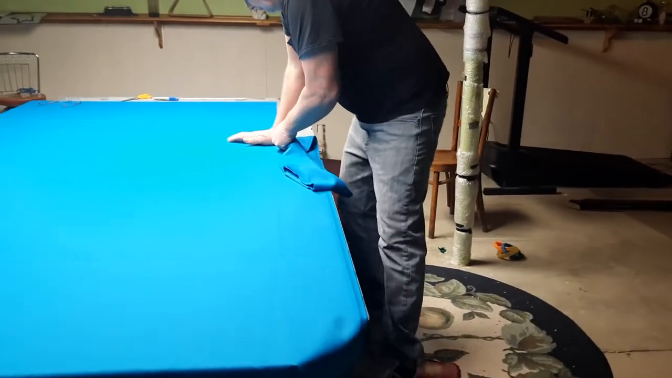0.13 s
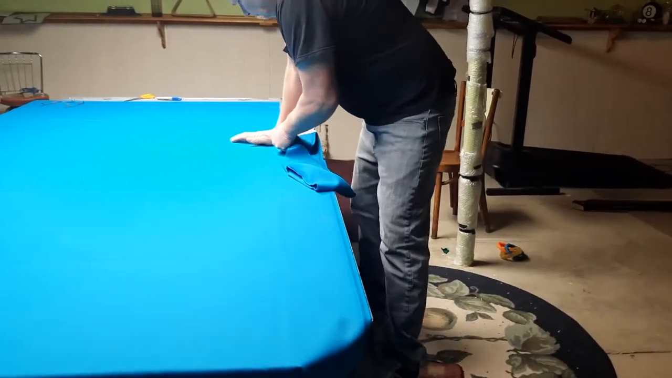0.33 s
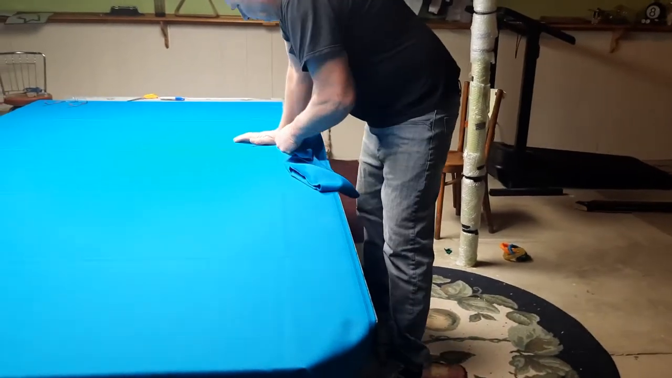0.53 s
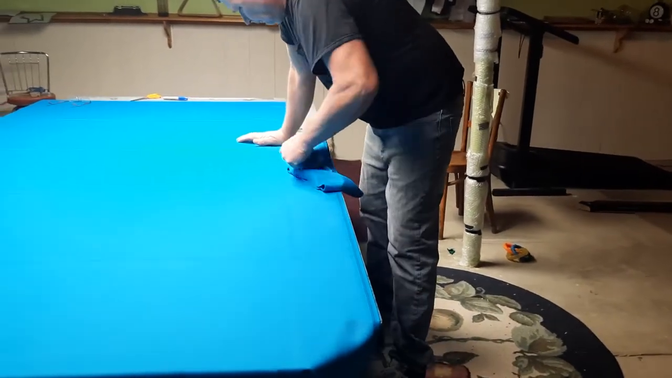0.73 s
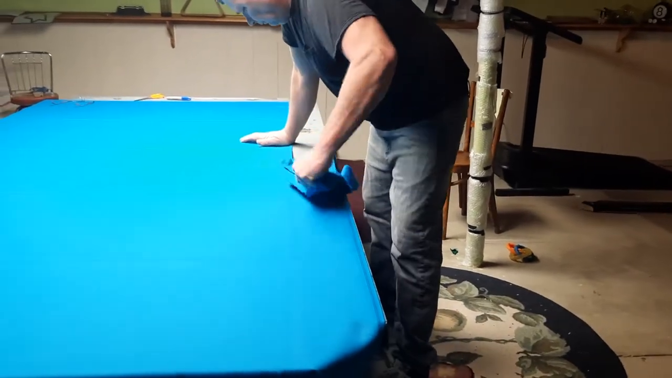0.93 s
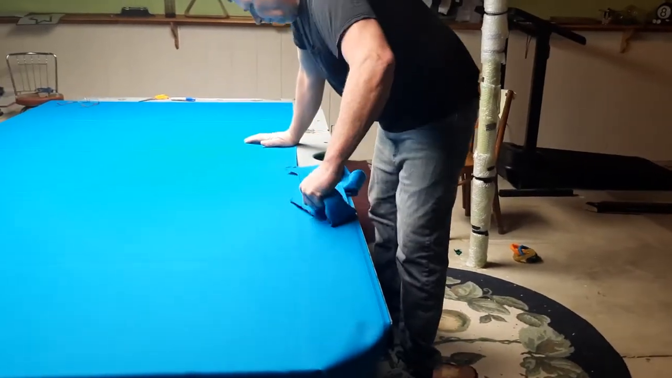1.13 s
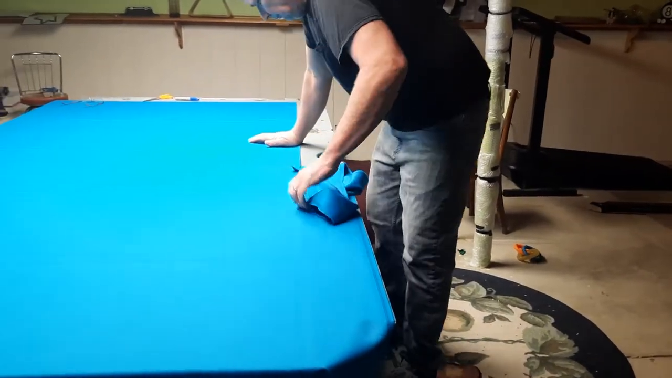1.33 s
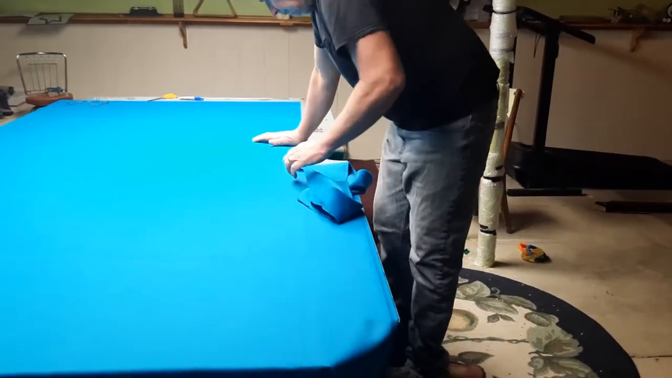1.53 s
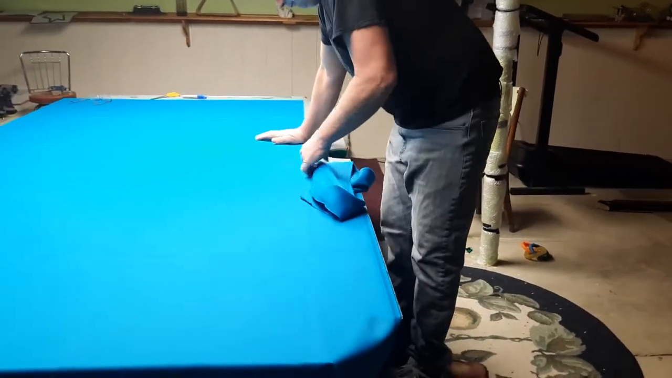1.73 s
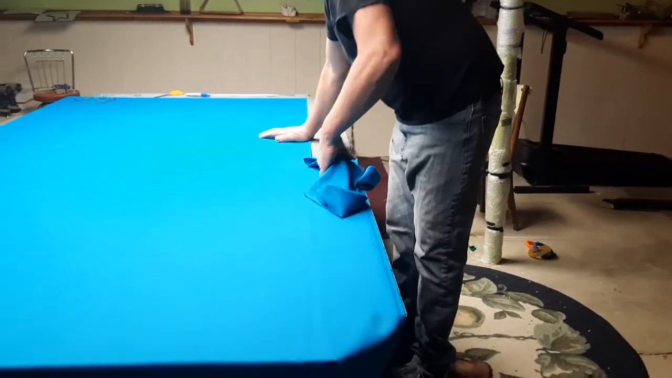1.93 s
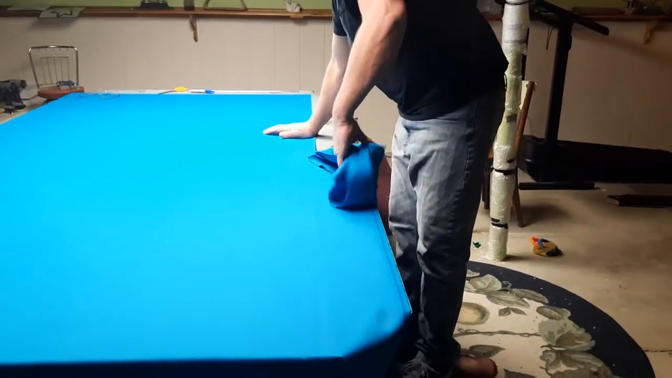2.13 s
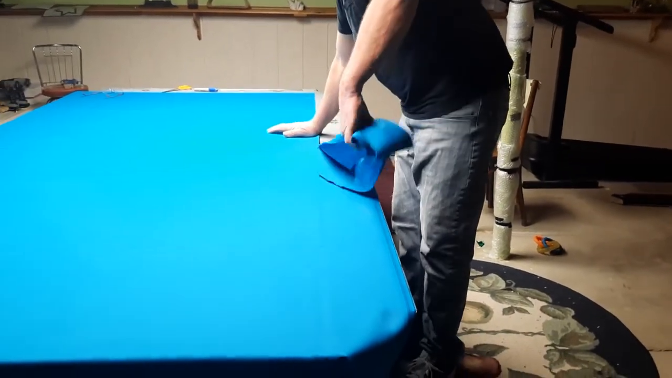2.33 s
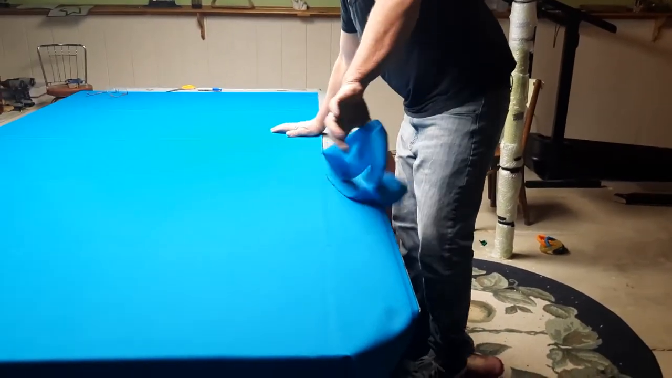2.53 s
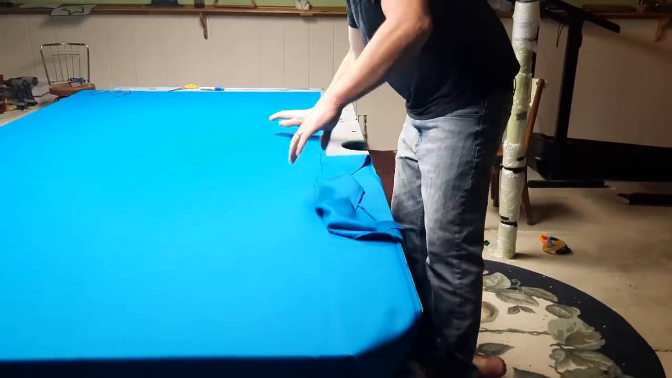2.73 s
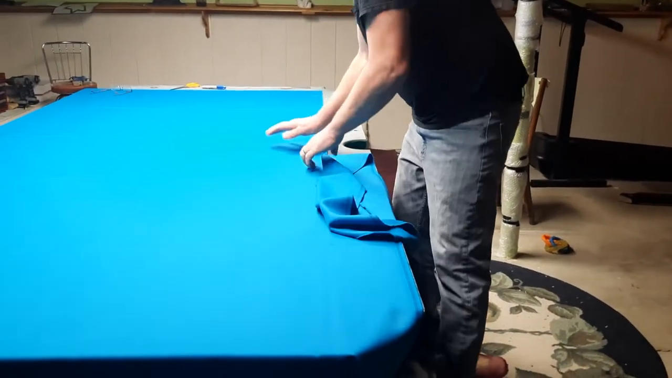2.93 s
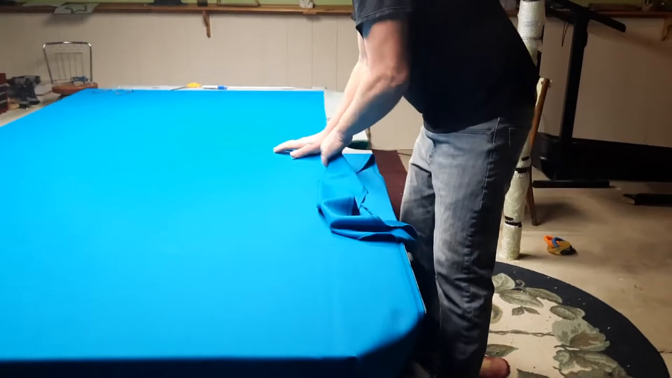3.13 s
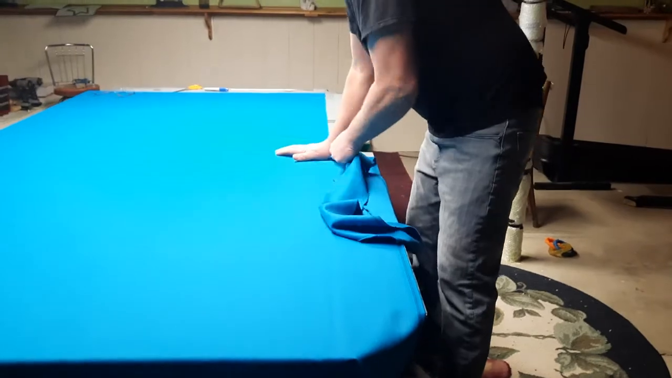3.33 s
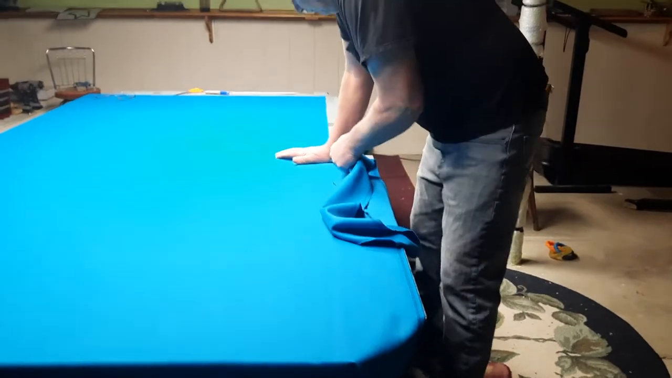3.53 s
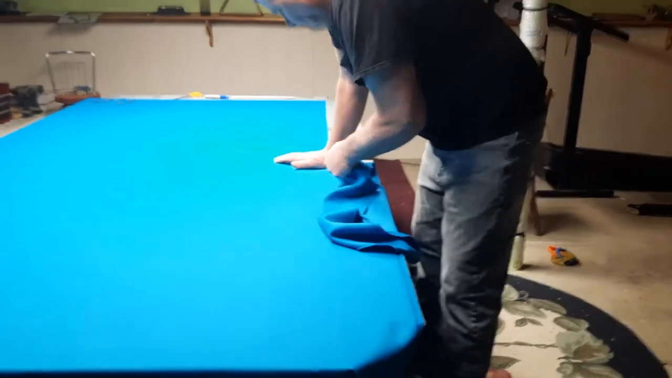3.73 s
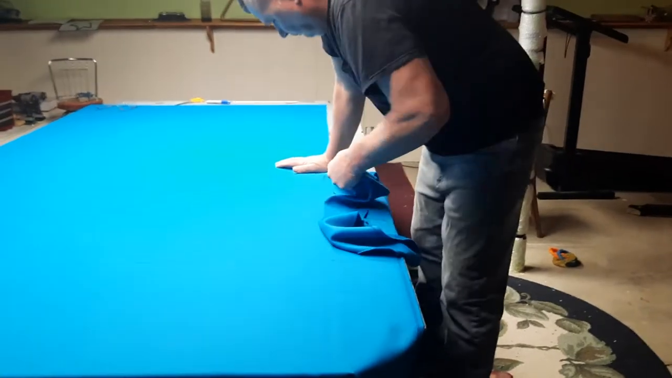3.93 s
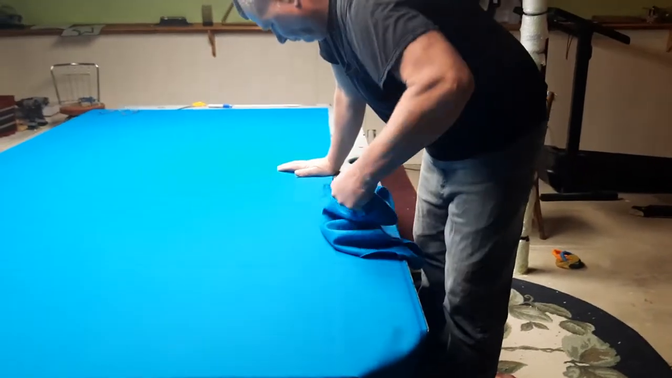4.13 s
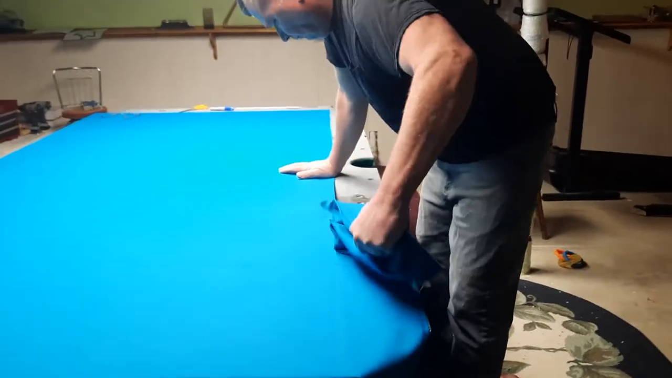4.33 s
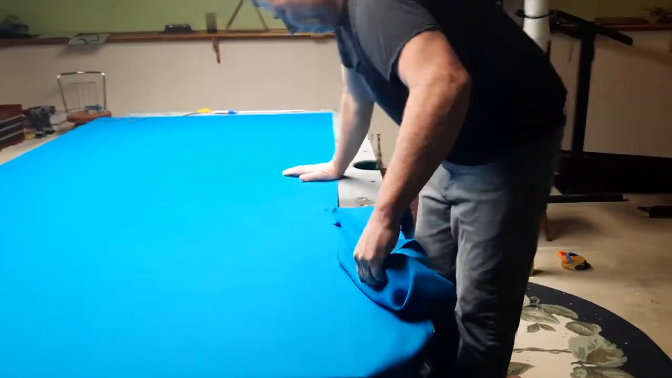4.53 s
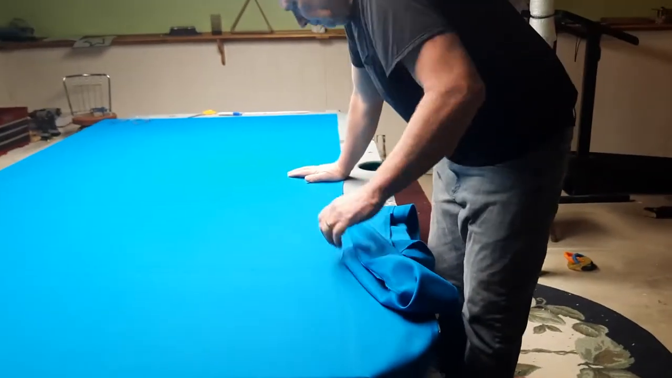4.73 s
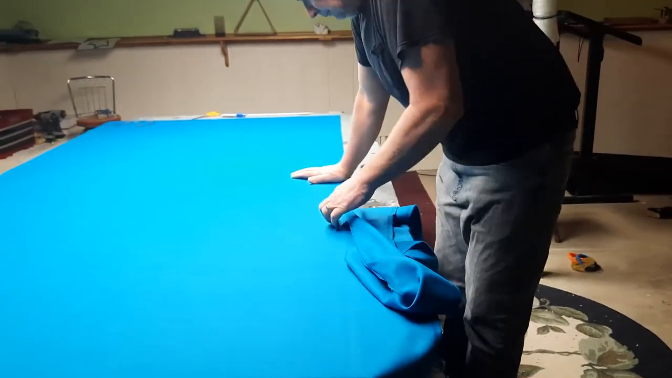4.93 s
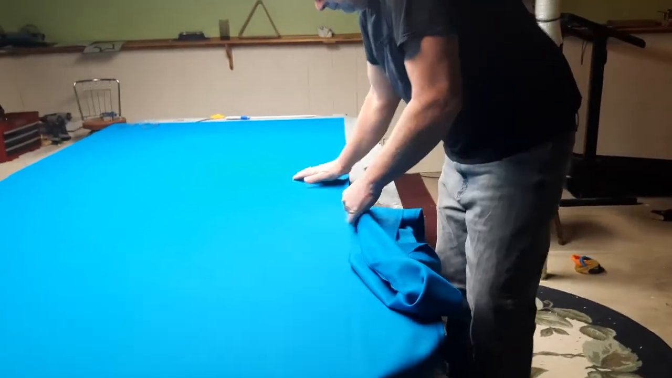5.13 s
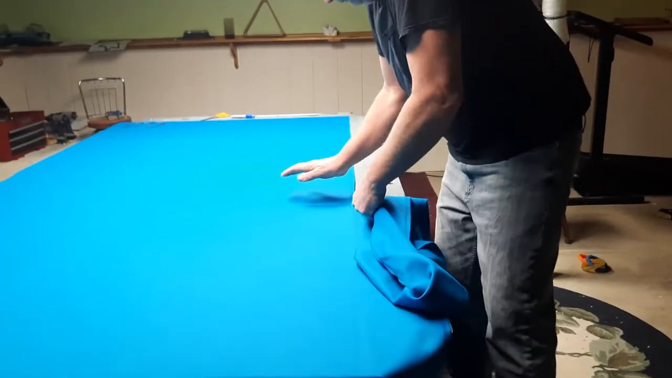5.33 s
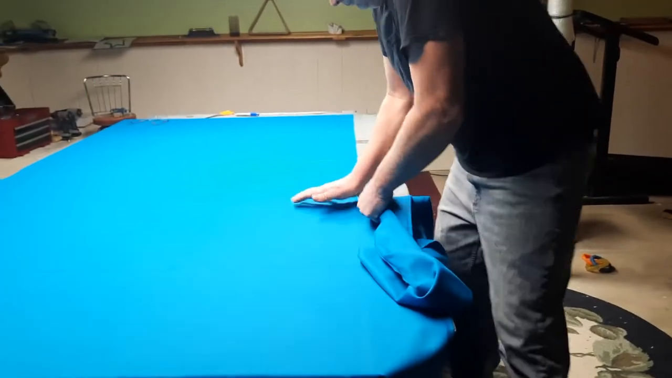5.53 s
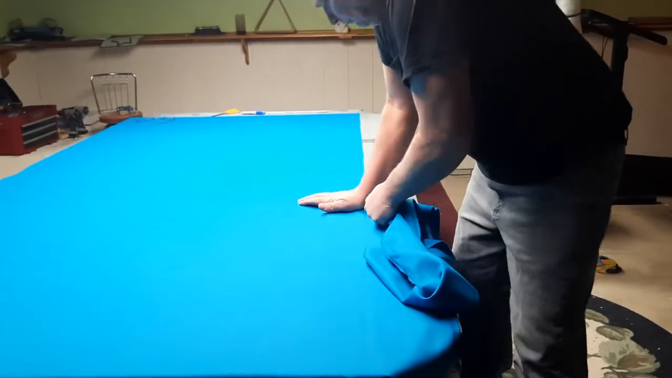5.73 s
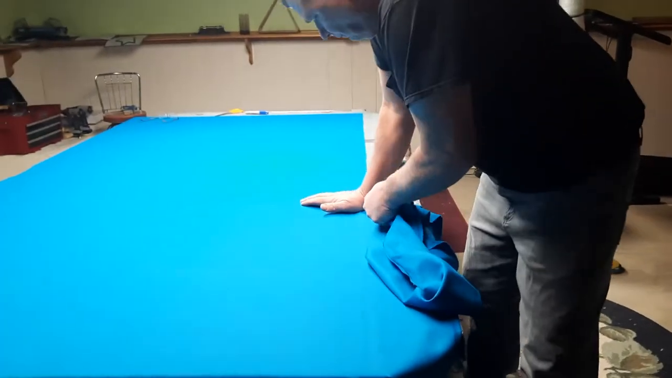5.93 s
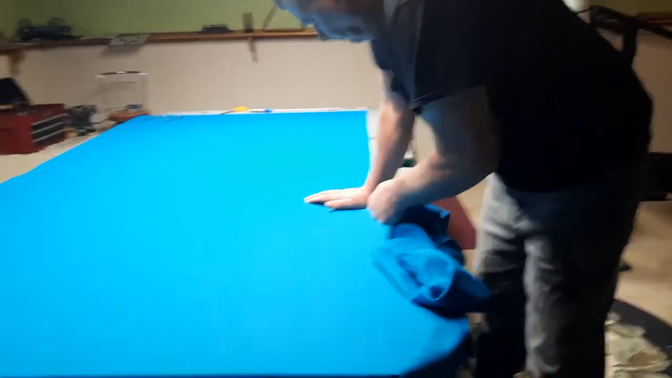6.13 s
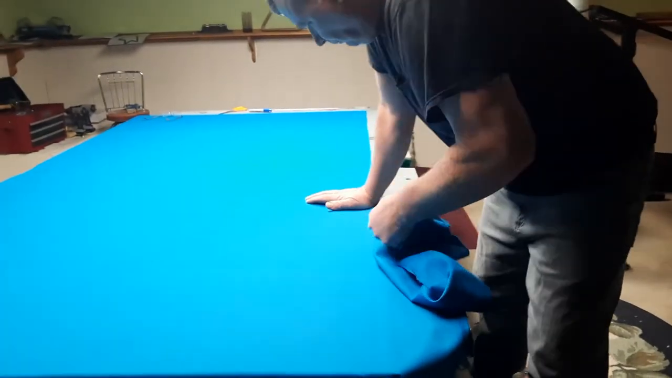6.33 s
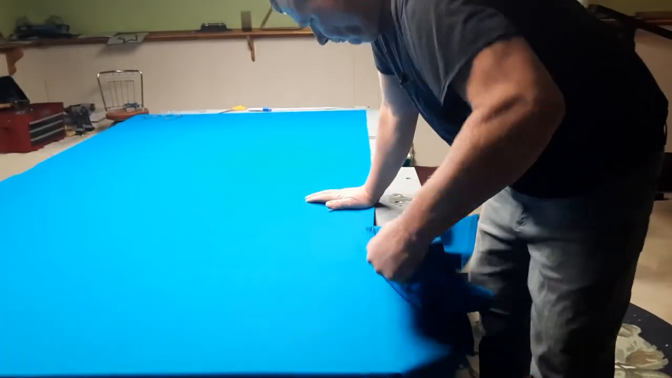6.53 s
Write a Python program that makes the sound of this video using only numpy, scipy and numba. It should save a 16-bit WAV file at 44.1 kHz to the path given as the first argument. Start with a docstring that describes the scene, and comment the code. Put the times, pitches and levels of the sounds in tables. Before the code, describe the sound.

Felt is torn by hand from a pool table in a hushed basement. A soft slide of cloth leads into a loud rip full of snapping threads. After a pause with faint sliding and a few handling thuds on the microphone, a second rip follows. A dull wooden bump comes just before the third. Each rip lasts under a second and drops in pitch, heard on a hand-held phone with slight room echo.

```python
"""A soft slide of cloth, then a loud rip: felt is torn off a pool table by hand in three long pulls.
Threads snap, fibres fizz, the table drums and the freed strip rings lower as it grows.
Between pulls the cloth slides and the table is bumped, all echoing in a hushed basement room.
It is heard through a hand-held phone: shifting fingers thud on the case and reshape the hollows
around its two microphone ports."""
import sys
import numpy as np
from scipy import signal
from scipy.fft import rfft, irfft
from scipy.io import wavfile
from scipy.ndimage import uniform_filter1d
from numba import njit

SR = 44100
rng = np.random.default_rng(int(sys.argv[2]) if len(sys.argv) > 2 else 0)


def store_pcm(level_fs):
    """Save levels as 16-bit WAV."""
    pcm = np.round(np.clip(level_fs, -1, 1) * 32767).astype(np.int16)
    wavfile.write(sys.argv[1], SR, np.atleast_2d(pcm).T)


N = 290178
TIME = np.arange(N) / SR

# The three rips. Each row: start and end in seconds, level in dB, attack in seconds, first and last
# strip pitch in Hz, then the mix in dB: strip, drumming at mid-pull, fizz at the end, growth of the fizz.
PULLS = [(.30, 1.04, -26, 0.061, 1990, 542, -3, -7.5, -3.5, 4.5),
         (3.682, 4.347, -23.5, .13, 1430, 596, -5.5, -5, -7.5, -1),
         (6.028, 6.607, -24.5, 0.17, 1540, 710, -8, -1, -5.5, 0)]
# Where the tear surges or eases. Each row: middle and half length in seconds, then thread boost,
# fizz boost and rail ring in dB.
SURGES = [(0.407, 0.084, 2, -2, -6.5), (.62, 0.099, -3, -1, -20), (0.683, 0.044, -0.5, 5, -14.5),
          (0.76, 0.055, -1, 0.5, -4.5), (0.914, 0.048, -1, 3, -2), (1.083, 0.036, 5.5, -0.5, -6),
          (3.802, .035, 2, 3, -5), (3.89, 0.024, -2.5, -0.5, -15), (3.966, .06, 1, -2, -4),
          (4.095, 0.056, -0.5, -1.5, -3.5), (4.267, 0.054, 1.5, 3.5, -12.5), (6.08, 0.052, 0.5, 2, -6),
          (6.392, 0.052, 1.5, 0, -5.5), (6.543, 0.089, -0.5, 0, -1)]
# Tone of the snapping threads, bright fizz and hollow table. Each row: frequency in Hz, gain in dB.
THREAD_EQ = [(100, -32.5), (400, -32), (650, -14.5), (950, -4.5), (1600, -1), (2600, -3), (4500, -5.5),
             (6500, -17.5), (9000, -24.5), (15000, -31)]
FIBRE_EQ = [(2000, -22.5), (5000, 6.5), (7000, 5), (10000, 0), (13000, -1), (16000, -8)]
TABLE_EQ = [(25, -47.5), (60, -24), (100, -24), (150, -10), (205, -15), (260, -9), (305, 2.5), (400, -1.5),
            (520, -6.5), (750, -8), (1500, -18.5), (5000, -62.5)]

def tearing(snap_db=-0.5, rail_rest_db=-14, judder_db=0.08):
    """The tear runs in tiny jerks: threads snap, fibres fizz, and the strip, rail and table ring."""
    snap = scatter(crackle(rate=2200, spread_db=1.5), THREAD_EQ, spread=1.44)
    fizz = scatter(crackle(rate=9000, spread_db=3), FIBRE_EQ, spread=1.3)
    drum = unit(colour(crackle(rate=1500, spread_db=-1), TABLE_EQ))
    ring = unit(rail(crackle(rate=500, spread_db=0.5)))
    plucks = crackle(rate=900, spread_db=5.5)
    ring_gain = undb(rail_rest_db)
    for middle, half, threads_db, fizz_db, rail_db in SURGES:
        swell = np.exp(-((TIME - middle) / half) ** 2)
        snap = snap * undb(threads_db * swell)
        fizz = fizz * undb(fizz_db * swell)
        ring_gain = ring_gain + undb(rail_db) * swell
    out = 0
    for row in PULLS:
        effort, strip_gain, drum_gain, fizz_gain, strip_hz = pull(*row)
        strip = freed_strip(plucks, strip_hz)
        strip /= np.sqrt(np.average(strip ** 2, weights=effort))  # rms 1 during the pull
        felt = undb(snap_db) * snap + strip_gain * strip + fizz_gain * fizz
        wood = ring_gain * ring + drum_gain * drum
        out = out + effort * (felt + wood)
    return out * undb(judder_db * drift(70))

def pull(start, end, db, attack_s, first_hz, last_hz, strip_db, drum_db, fizz_db, fizz_rise_db):
    """Strain builds, the arm leans in, then lets go; the strip's pitch falls as 1 / length."""
    lean_db_per_s, release_db_per_s, drum_rise_db = 2, 266, 4
    age = np.maximum(TIME - start, 0)
    freed = np.minimum(age / (end - start), 1)
    lean_db = lean_db_per_s * (np.minimum(TIME, end) - (start + end) / 2)
    release_db = release_db_per_s * np.maximum(TIME - end, 0)
    effort = (1 - np.exp(-age / attack_s)) * undb(db + lean_db - release_db)
    drum_gain = undb(drum_db + drum_rise_db * (freed - .5))  # grows as more cloth comes free
    fizz_gain = undb(fizz_db + fizz_rise_db * (freed - 1))
    strip_hz = 1 / ((1 - freed) / first_hz + freed / last_hz)
    return effort, undb(strip_db), drum_gain, fizz_gain, strip_hz

def freed_strip(plucks, hz, overtone_ratio=2.94, overtone_db=-5.5):
    """The taut strip rings at its pitch and one overtone, filtered twice to thin out the lows."""
    def mode(centre, damping):
        return resonate(resonate(plucks, centre, damping), centre, damping)
    return mode(hz, damping=0.55) + undb(overtone_db) * mode(overtone_ratio * hz, damping=0.31)

# The rail's ring. Each row: pitch in Hz, bandwidth as a fraction of the pitch, level in dB.
RAIL_MODES = [(2678, 0.16, 6), (4330, 0.024, -18)]

def rail(x):
    """The stapled wooden edge rings briefly."""
    return sum(undb(db) * resonate(x, np.full(N, hz), damping) for hz, damping, db in RAIL_MODES)

# Accents on the rips. Each row: start in seconds, relative level in dB, send to the rail in dB.
SNAPS = [(0.3047, 3, -7.5), (0.3137, -5, -5), (.3275, 3, 3), (0.3493, 2.5, -8), (.3565, 3.5, -9.5),
         (0.381, 7.5, -6), (.39, 4.5, -11.5), (.4003, 11, -9.5), (0.4099, 2.5, -10.5), (0.426, 9, -11.5),
         (0.4874, 9.5, -15), (.572, 7, -12), (.7408, 5.5, -8.5), (3.607, -14.5, -12), (3.675, -21, -8),
         (3.688, -1, -6.5), (3.7058, -1, -4.5), (3.723, 5, -12), (6.031, 1.5, -11), (6.047, -5, -7),
         (6.0628, 3.5, -7), (6.076, 1.5, -9), (6.56, -6, 20)]

def snaps(snap_db=1, rail_return_db=6):
    """The strongest threads and seams let go one by one and set the rail ringing."""
    cracks = impulses([(start, db) for start, db, _ in SNAPS])
    ring = rail(impulses([(start, db + send_db) for start, db, send_db in SNAPS]))
    return undb(snap_db) * colour(cracks + undb(rail_return_db) * ring, THREAD_EQ)

# Short, thin squeaks. Each row: start in seconds, level in dB, decay in seconds, pitch in Hz.
SQUEAKS = [(3.636, -36.5, 0.02, 4070), (3.691, -30, 0.0064, 4290), (3.702, -26.5, 0.0069, 2550),
           (3.736, -29.5, 0.047, 4450)]

def squeaks(damping=0.056):
    """Cloth snagged on the rail sticks and slips, ringing one narrow pitch for a moment."""
    slips = crackle(rate=1500, spread_db=0)
    out = 0
    for start, db, decay_s, hz in SQUEAKS:
        ring = unit(resonate(slips, np.full(N, hz), damping))
        out = out + undb(db) * ring * burst(start, decay_s)
    return out

# A knock with a rattle of the rail. Each row: start in seconds, relative level in dB, low-pass in Hz.
BUMPS = [(5.559, -2.5, 121), (5.6196, 10, 3030), (5.6247, -10, 2980), (5.625, -4, 3000), (5.633, 7, 1200),
         (5.6432, 9.5, 590), (5.6503, 8, 600), (5.666, -3, 1500)]
# The woody body of the knock. Each row: frequency in Hz, gain in dB.
BUMP_EQ = [(30, -37), (60, -12), (140, -2), (210, -13.5), (310, 6), (420, -2), (560, -5), (900, -12.5),
           (1250, -17.5), (1600, -8), (2100, -19.5), (2800, -12), (3600, -26.5), (12000, -43.5)]

def bumps():
    """Dull blows on the wooden table; softer contact loses the treble."""
    force = sum(butter(impulses([(start, db)]), 1, hz, "low") for start, db, hz in BUMPS)
    return colour(force, BUMP_EQ)

# Cloth moving under the hands. Each row: start and end in seconds, opening level in dB,
# swell in dB per second, brush pitch in Hz, brush level against the stroke in dB.
STROKES = [(0, 0.306, -54, 2, 4300, -18), (2.22, 2.722, -54, 10, 4380, -9.5),
           (3.05, 3.6, -54, 2, 4300, -44), (5.04, 5.339, -63.5, -5, 2900, -1),
           (5.99, 6.097, -55.5, -6, 2860, -22)]
# The soft, dark tone of the nap. Each row: frequency in Hz, gain in dB.
CLOTH_EQ = [(30, -28.5), (70, -13.5), (150, -4), (220, -13), (340, 2.5), (480, -5.5), (700, -14),
            (1200, -16), (2700, -18), (4500, -22.5), (6500, -29), (9000, -33), (15500, -39)]

def sliding(attack_s=0.14, release_s=0.09, rustle_db=-76.5):
    """The nap catches and slips; each stroke swells in, brushes at its own pitch and dies away."""
    nap = scatter(crackle(rate=9000, spread_db=5), CLOTH_EQ, spread=0.8)
    out = undb(rustle_db) * nap  # held cloth is never quite still
    for start, end, db, swell_db_per_s, hz, brush_db in STROKES:
        fades = np.exp(np.minimum(TIME - start, 0) / attack_s - np.maximum(TIME - end, 0) / release_s)
        level = undb(db + swell_db_per_s * (np.clip(TIME, start, end) - start))
        brush = unit(resonate(crackle(rate=8300, spread_db=1.5), np.full(N, hz), damping=0.26))
        out = out + (nap + undb(brush_db) * brush) * fades * level
    return out * undb(.5 * drift(12))

# Handling thuds. Each row: start in seconds, level in dB, pitch in Hz, left minus right in dB.
FINGERS = [(3.136, -19.5, 293, -22.5), (3.304, -26.5, 126, 0), (3.608, -20, 250, 17),
           (3.644, -28, 284, 26.5), (3.709, -13, 344, 17.5)]

def fingers(decay_cycles=0.66, case_hz=95, case_db=-15, sway_hz=42, sway_db=-21):
    """Each touch is a short thud in the case; the case rings low and the phone sways."""
    def mode(start, hz, decay_s):
        age = np.maximum(TIME - start, 0)
        return np.sin(2 * np.pi * hz * age) * np.exp(-age / decay_s)
    out = np.zeros((2, N))
    for start, db, hz, pan_db in FINGERS:
        thud = mode(start, hz, decay_cycles / hz)
        ring = undb(case_db) * mode(start, case_hz, decay_s=0.017)
        sway = undb(sway_db) * mode(start, sway_hz, decay_s=0.034)
        rocking = ring + sway  # the two ends of the case move against each other
        out += pan(db, pan_db) * np.array([thud - rocking, thud + rocking])
    return butter(out, 3, 42, "high")

# Crisp handling ticks. Each row: start in seconds, relative level in dB, decay in seconds,
# left minus right in dB.
TICKS = [(3.095, -60, 0.044, -23), (3.13, -51, 0.0035, -32), (3.279, -40, 0.0024, -25),
         (3.2971, -27.5, 0.0014, -19), (3.303, -34, 0.0014, -17), (3.445, -45.5, 0.0057, -12),
         (3.4585, -37, 0.002, -6), (3.606, -42.5, 0.018, -16), (3.638, -45.5, 0.021, 21.5),
         (3.673, -35, 0.00091, 18), (3.69, -25.5, 0.0019, 3), (3.708, -31, 0.008, -5),
         (5.623, -46, 0.0053, -16), (5.685, -49, 0.058, -2), (5.947, -43.5, 0.0037, -5),
         (6.026, -37, 0.004, 3), (6.062, -36, 0.0022, 11)]
# Tone of the ticks. Each row: frequency in Hz, gain in dB.
TICK_EQ = [(300, 6), (1500, 4.5), (4000, -0.5), (7000, -6), (15000, -12.5)]

def ticks():
    """Handling makes short, dry scratches close by, each a burst of noise."""
    envelope = sum(pan(db, pan_db) * burst(start, decay_s) for start, db, decay_s, pan_db in TICKS)
    return envelope * np.array([unit(colour(rng.standard_normal(N), TICK_EQ)) for _ in range(2)])

# Dark room tone. Each row: frequency in Hz, gain in dB.
AIR_EQ = [(25, -35), (60, -11.5), (130, -6.5), (220, -10), (340, 3), (450, -6), (700, -14.5), (1200, -16.5),
          (2500, -18.5), (4000, -28.5), (6000, -35), (9000, -41.5), (15500, -45.5)]

def air(level_db=-58):
    """The steady hush of the room."""
    hush = diffuse_pair(*(colour(rng.standard_normal(N), AIR_EQ) for _ in range(2)))
    return unit(hush) * undb(level_db + 0.23 * drift(2.4))

def room(x, early_db, tail_db, early_s=0.055, t60_low=0.41, t60_high=0.19, path_sets=4):
    """Direct sound, reflections off the table, then the room; the paths shift as the source moves."""
    x = np.atleast_2d(x)
    t = TIME[:int(.6 * SR)]

    def decay(t60):
        return unit(rng.standard_normal(len(t)) * undb(-60 * t / t60)) / np.sqrt(len(t))

    def paths():
        tail = butter(decay(t60_low), 2, 4500, "low") + butter(decay(t60_high), 2, 4500, "high")
        return undb(early_db) * decay(early_s) + undb(tail_db) * tail * np.minimum(t / .006, 1)
    fade_out = np.cos(np.pi / 2 * (t / t[-1]) ** 4) ** 2
    shares = np.array([drift(14) for _ in range(path_sets)])
    shares /= np.sqrt(np.sum(shares ** 2, axis=0))  # equal-power blend
    echoes = 0
    for share in shares:
        response = fade_out * diffuse_pair(paths(), paths())
        echoes = echoes + signal.oaconvolve(share * x, response, axes=1)[:, :N]
    return (x + echoes) / np.sqrt(1 + undb(early_db) ** 2 + undb(tail_db) ** 2)

def scatter(clicks, eq, spread):
    """Every fibre radiates its own way, so each port gets a different share of it."""
    return unit(np.array([colour(clicks * (1 + spread * rng.standard_normal(N)), eq) for _ in range(2)]))

def diffuse_pair(common, apart, split_hz=900):
    """Two close ports hear diffuse bass alike and diffuse treble differently."""
    hz = np.fft.rfftfreq(len(common), 1 / SR)
    angle = np.pi / 4 * np.tanh(hz / split_hz)
    mid, side = np.cos(angle) * rfft(common), np.sin(angle) * rfft(apart)
    return irfft(np.array([mid + side, mid - side]), len(common))

def crackle(rate, spread_db):
    """Random clicks, about `rate` a second; a positive spread makes a few stand out."""
    size = undb(spread_db * np.minimum(rng.exponential(size=N), 3))
    return unit((rng.random(N) < rate / SR) * size * rng.choice([-1, 1], N))

def impulses(rows):
    """One click for each start in seconds and level in dB."""
    x = np.zeros(N)
    for start, db in rows:
        x[int(start * SR)] += undb(db)
    return x

def burst(start, decay_s):
    """An envelope with an instant attack and an exponential decay."""
    return (TIME >= start) * np.exp(-np.abs(TIME - start) / decay_s)

def drift(rate):
    """A random wander with a spread near 1, turning `rate` times a second."""
    step = max(int(SR / rate), 1)
    return 1.1 * uniform_filter1d(np.repeat(rng.standard_normal(N // step + 1), step), step)[:N]

def colour(x, eq, size=4096):
    """Minimum-phase EQ through points of frequency in Hz and gain in dB."""
    hz, db = np.transpose(eq)
    log_bins = np.log(np.fft.rfftfreq(size, 1 / SR) + 1)
    cepstrum = irfft(np.log(undb(np.interp(log_bins, np.log(hz), db))))
    cepstrum[1:size // 2] *= 2
    cepstrum[size // 2 + 1:] = 0
    return signal.fftconvolve(x, irfft(np.exp(rfft(cepstrum))))[:N]

@njit
def resonate(x, hz, damping):
    """A sweepable band-pass; damping is bandwidth over centre frequency."""
    out = np.empty(len(x))
    band_state, low_state = 0., 0.
    for i in range(len(x)):
        g = np.tan(np.pi * hz[i] / SR)
        band = (band_state + g * (x[i] - low_state)) / (1 + g * (g + damping))
        band_state = 2 * band - band_state
        low_state += 2 * g * band
        out[i] = damping * band
    return out

def butter(x, order, hz, kind):
    """A plain low-pass or high-pass."""
    return signal.sosfilt(signal.butter(order, hz, kind, fs=SR, output="sos"), x)

def pan(db, pan_db):
    """Left and right gains, pan_db apart."""
    return undb(db + np.array([[pan_db], [-pan_db]]) / 2)

def undb(db):
    """Decibels to gain."""
    return 10 ** (np.asarray(db) / 20)

def unit(x):
    """Scaled to rms 1."""
    return x / np.sqrt(np.mean(x ** 2))

def scene():
    """Cloth and table sound through the room; touches on the phone stay dry."""
    cloth = room(tearing() + sliding(), early_db=-5.5, tail_db=-1.5)
    threads = room(snaps() + squeaks(), early_db=-7.5, tail_db=-5.5)
    table = room(bumps(), early_db=-1.5, tail_db=11.5)
    return undb(0.5) * cloth + threads + undb(13.5) * table + fingers() + undb(-1.5) * ticks() + air()

# One EQ for each of three grips. Each row: frequency in Hz, left gain in dB, right gain in dB.
GRIP_EQS = [
    [(296, -3.5, -2), (674, -1.5, -4.5), (1010, 1.5, -1.5), (1690, 7, -5.5), (2170, 17, -1.5),
     (2770, -0.5, -2), (3820, 7.5, -3.5), (4000, -14.5, 1.3), (5400, -15, 0), (6960, -12, -4),
     (8350, -7, -7), (10400, -11, -11), (11400, -3.5, -7.5), (15500, -5, 1.5)],
    [(300, -1, 0.04), (680, -0.7, -3.5), (1013, 3.5, 2.5), (1490, -2, -2.5), (2020, 0.7, 2.5),
     (2840, -7.5, 2), (3320, -8, -0.5), (3900, -8, -1), (4520, -2.5, -5.5), (5000, -8, -0.5),
     (6040, -2.9, 6.5), (7140, -2.8, -2), (10000, 1, -2), (15000, 6, 5)],
    [(310, 1, -1), (615, -4.5, -5), (1140, 2, 1), (1640, -3.5, -3.5), (2200, 0, 0.7), (2980, 4.5, 4.5),
     (3680, 5, 0.5), (4850, 10.5, -0.5), (5840, -14, 7), (6000, 6.5, 6), (7640, -2, -2), (9800, 0, -3.5),
     (11900, 7, -1.0), (15500, 7.5, 7)],
]
# The two moments when the grip shifts, in seconds.
REGRIP_S = [3.64, 6.12]

def record(dry, crossfade_s=0.082, top_hz=16000):
    """The hand cups each port into a resonant hollow that changes with the grip."""
    first, second = (np.clip((TIME - middle) / crossfade_s + .5, 0, 1) for middle in REGRIP_S)
    out = 0
    for grip, share in zip(GRIP_EQS, (1 - first, first - second, second)):
        hz, *port_dbs = np.transpose(grip)
        cupped = [colour(channel, np.transpose([hz, db])) for channel, db in zip(dry, port_dbs)]
        out = out + share * np.array(cupped)
    top_cut = signal.ellip(10, .2, 70, top_hz, fs=SR, output="sos")
    return signal.sosfilt(top_cut, np.clip(out, -1, 1))

dry = scene()
out = record(dry)
store_pcm(out)
```